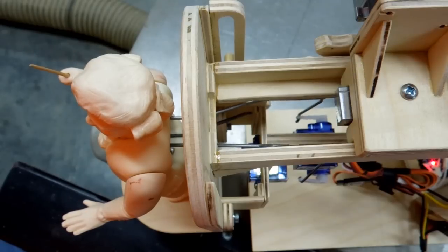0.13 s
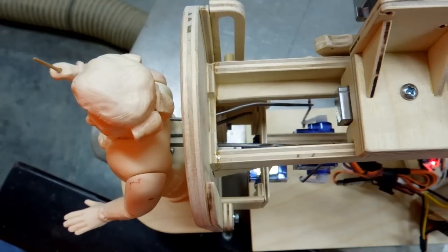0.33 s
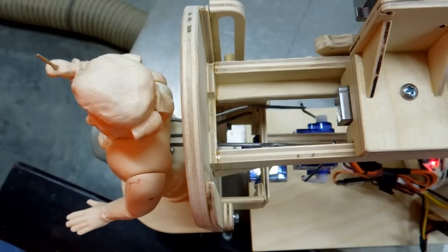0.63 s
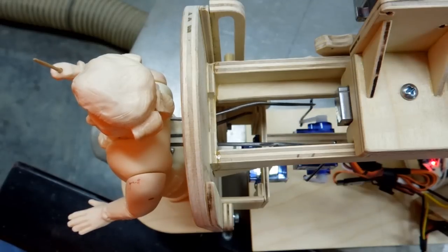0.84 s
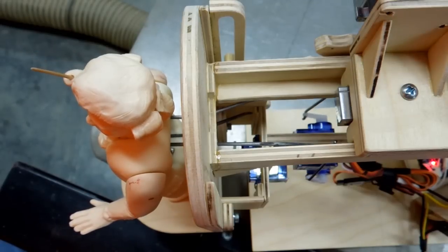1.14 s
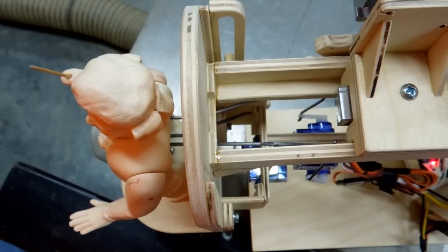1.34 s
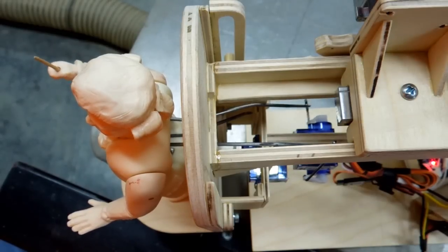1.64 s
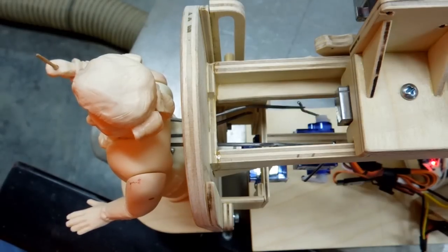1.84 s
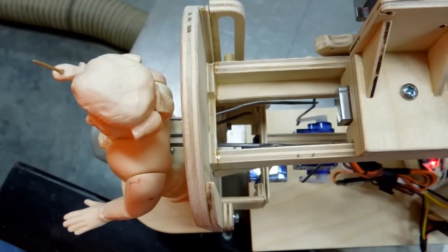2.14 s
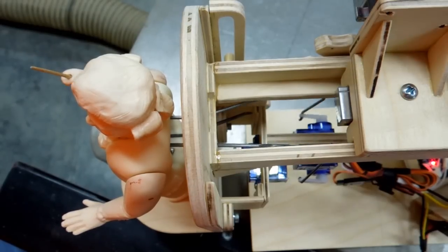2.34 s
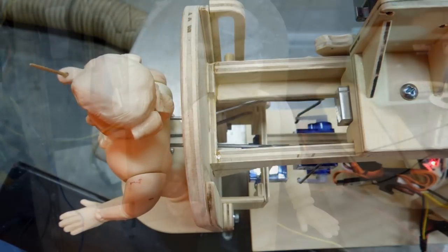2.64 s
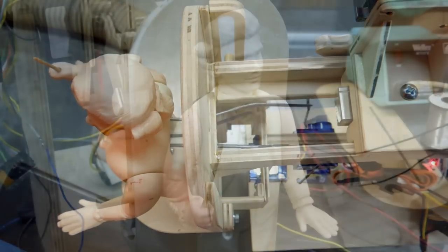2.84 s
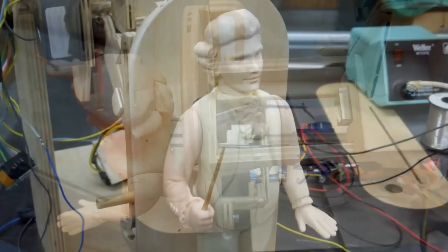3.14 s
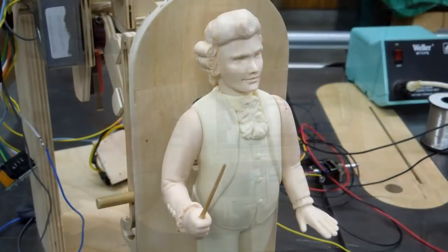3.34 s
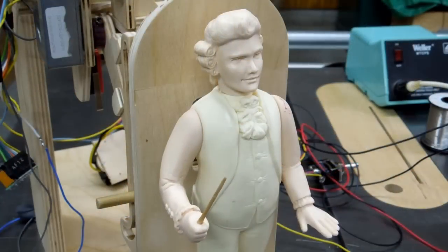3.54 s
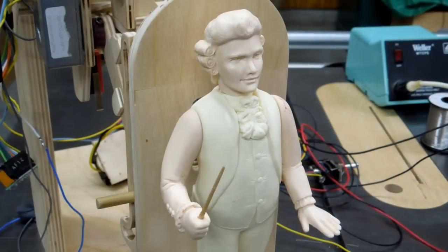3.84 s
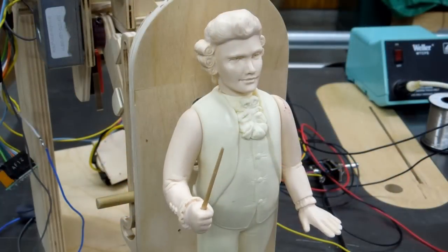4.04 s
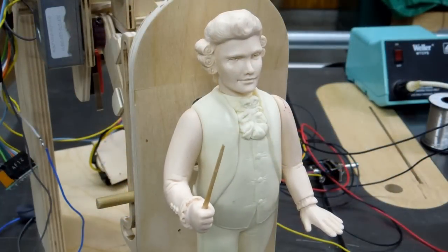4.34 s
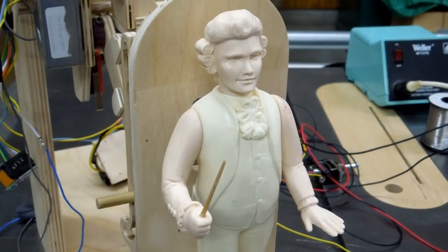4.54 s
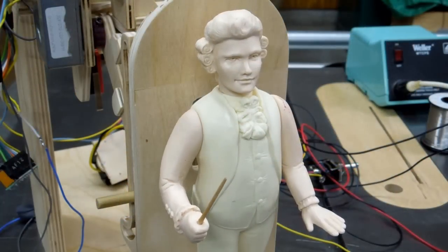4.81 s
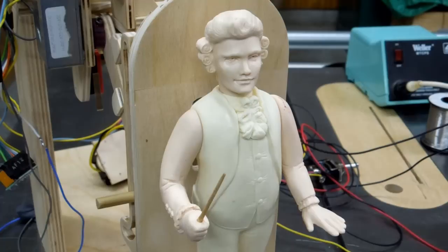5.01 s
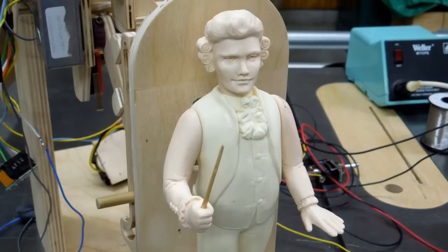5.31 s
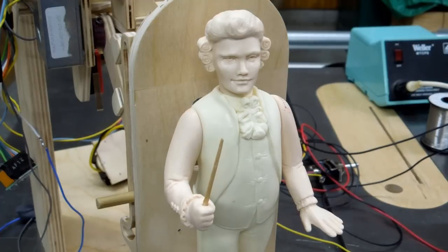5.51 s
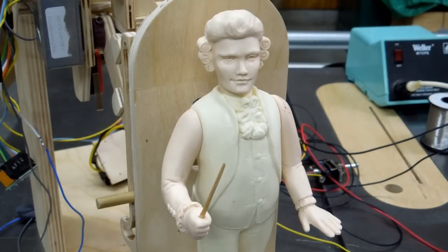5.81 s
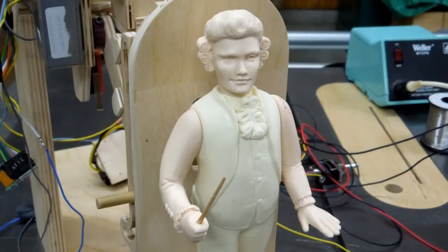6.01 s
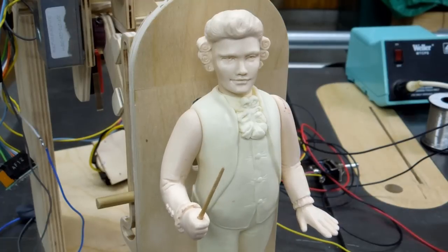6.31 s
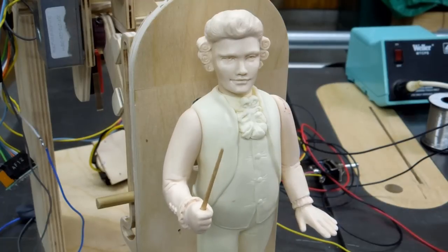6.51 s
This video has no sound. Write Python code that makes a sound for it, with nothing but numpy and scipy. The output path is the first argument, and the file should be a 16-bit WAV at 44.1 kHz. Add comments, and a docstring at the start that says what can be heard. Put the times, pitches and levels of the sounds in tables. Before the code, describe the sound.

From the start, a small servo motor is heard close up, swinging a puppet's arm through a rod in a plywood frame. Its plastic gears make a fine, high, clicking buzz with a fast flutter and little catches. Each lift and each fall lasts about 0.6 seconds, with a very brief rest at every turn, so the pattern repeats evenly about every 1.2 seconds. At first the sound is bright and raspy, heard from above the open mechanism, with the frame and rod ringing lightly. Between about 2.6 and 3.6 seconds it blends smoothly into the same motor heard from in front, softer and less bright, with a slight judder on the downstrokes. The strokes continue until the end, at around 6.5 seconds. A soft, low rush of workshop air lies underneath throughout, joined from about 3 seconds by a faint electrical hum and fan drone.

```python
"""A hobby servo swings a puppet's baton arm up and down through a rod in a plywood frame.
Its controller kicks the motor 50 times a second; the plastic gear teeth mesh and rattle, making the
gear case, frame and rod ring. Every beat has the same lift and fall, the same tight spots in the
gears and a brief rest at each turn. It is heard first from above the open mechanism, then, after a
cross-fade, from the front of the figure, where mains hum and a fan join the workshop's soft air noise."""
import sys
import numpy as np
from scipy import signal
from scipy.fft import rfft, irfft
from scipy.io import wavfile
from scipy.ndimage import uniform_filter1d

SR = 44100
rng = np.random.default_rng(int(sys.argv[2]) if len(sys.argv) > 2 else 0)


def transcribe(u):
    """Save the signal u as a 16-bit wav file named by the first command-line argument.

    u: samples, shape (n,) or (channels, n), limited to [-1, 1]; the rate is SR.
    q: integer samples, one column per channel.
    """
    v = np.clip(np.atleast_2d(u).T, -1, 1)
    q = np.round(v * 32767).astype(np.int16)
    wavfile.write(sys.argv[1], SR, q)


N = 293706
TIME, HZ = np.arange(N) / SR, np.fft.rfftfreq(N, 1 / SR)
CONTROL_HZ = 50
# one beat of the baton: the arm is lifted, rests, is lowered and rests again
BEAT_S, LIFT_S, LOWER_AT_S, LOWER_S = 1.24, 0.577, 0.607, 0.592


def servo(lift_at_s, lift, lower, case_modes, frame_modes, rod_modes, loaded_tone,
          start_load, case_rest_db, case_drop_db, frame_rest_db, judder_db):
    """Tooth strikes ring the gear case, the plywood frame and the push rod, beat after beat."""
    beat = (TIME - lift_at_s) % BEAT_S  # seconds into the current beat
    kick = control_kick()
    steps_db = judder_db * judder(beat)
    teeth = gear_teeth(arm_load(beat, start_load), loaded_tone) * jolts(beat) * amp(0.13 * steps_db)
    teeth = colour(teeth, 1 + amp(-11) * board_echoes(die_away_s=0.053))
    case = ring(teeth * amp(2.6 * kick), case_modes, steepness=3.47)
    frame = ring(teeth * amp(1.5 * kick), frame_modes, steepness=3.57)
    blows = teeth * (1 + 1.4 * np.tanh(2 * wander(690)))  # the loose rod takes the blows unevenly
    rod = ring(blows * amp(4.5 * kick + steps_db), rod_modes, steepness=4.7)
    case *= stroke_gain(beat, lift, lower, column=1, binding=0.99,
                        rest_db=case_rest_db, drop_db=case_drop_db, coast_s=0.024)
    frame *= stroke_gain(beat, lift, lower, column=2, binding=0.53,
                         rest_db=frame_rest_db, drop_db=0.5, coast_s=0.03)
    rod *= stroke_gain(beat, lift, lower, column=3, binding=0, rest_db=-54, drop_db=-1.5, coast_s=0.03)
    return amp(1.27) * case + amp(0.82) * frame + amp(0.85) * rod


def servo_from_above():
    """Above the open mechanism, the bright gear case is the loudest part."""
    # where gear case, frame and rod ring: (pitch [Hz], width [Hz], level [dB])
    case_modes = [(5770, 1030, -8), (7140, 210, -3), (7580, 410, 0.5), (8300, 360, -6.5), (8840, 610, 2),
                  (9910, 310, 0), (11000, 460, -4.5), (11560, 400, -2.5), (12500, 700, -7.5),
                  (13500, 800, -10.5), (14070, 400, -7.5)]
    frame_modes = [(1900, 200, -9), (2380, 560, -12.5), (2940, 320, -4), (3550, 120, 1), (4060, 310, 1.5),
                   (4760, 650, -5)]
    rod_modes = [(1200, 150, -4), (1443, 45, 3.5), (1686, 110, -5.5)]
    # loudness along each stroke: (time [s], gear case [dB], frame [dB], rod [dB])
    lift = [(0, -25, -36.5, -51), (0.07, -24, -35, -54), (0.12, -23, -33.5, -54.5),
            (0.2, -22.5, -33.0, -57), (0.29, -22, -34.5, -57), (0.4, -24, -36.0, -51.5),
            (0.49, -20.5, -33, -56), (0.578, -19, -33, -55)]
    lower = [(0, -18, -32, -45), (0.03, -22, -32.5, -46), (0.1, -22.5, -37, -53), (0.2, -22, -35.5, -49.5),
             (0.3, -23.5, -35.5, -50.5), (0.39, -22.5, -35, -50.0), (0.47, -21.5, -34, -45.5),
             (0.54, -18, -33.5, -47.5), (0.592, -19.5, -34.0, -47)]
    # how the arm's weight changes the tone of the teeth: (frequency [Hz], boost [dB])
    loaded_tone = [(1800, 0), (2300, 2.5), (3000, -4.5), (3500, 4), (3850, 0), (4500, 4), (5000, -1.5),
                   (5900, 1.5), (7500, -0.5), (8300, -2), (8800, -7.5), (9800, -0.5), (11400, 3.5),
                   (12800, -3), (14000, 0)]
    lift_at_s = 0.222
    return servo(lift_at_s, lift, lower, case_modes, frame_modes, rod_modes, loaded_tone,
                 start_load=0.39, case_rest_db=-37.5, case_drop_db=7, frame_rest_db=-41, judder_db=-0.3)


def servo_from_front():
    """In front of the figure, the gear case is softer and the rod judders on the way down."""
    # where gear case, frame and rod ring: (pitch [Hz], width [Hz], level [dB])
    case_modes = [(5340, 280, -3.5), (6600, 330, -4), (7110, 590, -2.5), (7850, 390, -3.5),
                  (8450, 500, -1.5), (9300, 330, -3.5), (10360, 410, -0.5), (10900, 400, -4.5),
                  (11700, 480, 0.5), (12500, 600, -6), (13500, 700, -10), (14100, 400, -10)]
    frame_modes = [(1890, 120, -10.5), (2620, 390, -15.5), (3120, 370, -11.5), (3690, 410, -2),
                   (4157, 340, -1), (4730, 180, -6)]
    rod_modes = [(1375, 37, 2.5), (1520, 130, -8.5), (1670, 95, -10.5)]
    # loudness along each stroke: (time [s], gear case [dB], frame [dB], rod [dB])
    lift = [(0, -32.0, -35.5, -49), (0.07, -32, -33.5, -53), (0.12, -31.5, -31.5, -50.5),
            (0.2, -32.5, -35.5, -52.0), (0.29, -31, -33, -52), (0.4, -31.5, -33.5, -51.5),
            (0.49, -29, -31.5, -51.5), (0.578, -29, -32.5, -48.5)]
    lower = [(0, -25.0, -27.5, -48), (0.03, -27.0, -32.5, -43), (0.1, -27, -32, -45.5),
             (0.2, -28.5, -33, -47.5), (0.3, -32, -36.5, -49), (0.39, -33.5, -36.5, -47),
             (0.47, -31.0, -35, -47), (0.54, -26, -30, -44), (0.592, -29.5, -33.0, -47.5)]
    # how the arm's weight changes the tone of the teeth: (frequency [Hz], boost [dB])
    loaded_tone = [(1800, 1), (2400, 8), (3100, -4), (3600, 3), (4700, 0), (5800, -0.5), (7500, -1),
                   (8900, -2), (9800, -0.5), (11400, 1.5), (12700, -4.5), (14000, 1.5)]
    lift_at_s = 3.882
    return servo(lift_at_s, lift, lower, case_modes, frame_modes, rod_modes, loaded_tone,
                 start_load=0.028, case_rest_db=-38.5, case_drop_db=-0.5, frame_rest_db=-38.5,
                 judder_db=3.0)


def gear_teeth(load, loaded_tone, mesh_hz=1440, rattles_per_s=8500, flutter_db=1.03):
    """The motor gear's teeth strike at an unsteady rate; the slack wheels behind it rattle at random."""
    sag = 0.5 - (TIME * CONTROL_HZ - 0.2) % 1  # the motor leaps at each control pulse, then slows
    tooth_hz = mesh_hz * (1 + 0.15 * sag + 0.05 * wander(45) + 0.012 * wander(500))
    strikes = np.diff(np.floor(np.cumsum(tooth_hz) / SR), prepend=0)
    mesh = strikes * amp(2.0 * rng.standard_normal(N))
    whine = amp(-4 + 5 * load ** 2) * unit(mesh - mesh.mean())  # load makes the mesh more regular
    rattle_size = amp(3.5 * np.minimum(rng.standard_normal(N), 2.2)) * rng.choice([-1., 1.], N)
    rattle = rattle_size * (rng.random(N) < rattles_per_s / SR)
    teeth = steady(whine + unit(rattle)) * amp(flutter_db * wander(102))
    return (1 - load) * teeth + load * colour(teeth, amp(curve(loaded_tone)))


def control_kick(first_s=0.0034, half_width_s=0.0026):
    """Each control pulse gives the motor a short push."""
    cycles_away = ((TIME - first_s) * CONTROL_HZ + 0.5) % 1 - 0.5
    return bump(cycles_away / CONTROL_HZ, half_width_s)


def arm_load(beat, at_start):
    """The weight on the gears grows through each lift and is gone on the way down."""
    return (beat < LIFT_S) * np.interp(beat, [0, LIFT_S], [at_start, 1])


def jolts(beat, half_width_s=0.0011):
    """The gears knock through their slack and catch, so the teeth briefly strike harder."""
    # catches of the gears: (time into the beat [s], boost [dB])
    catches = [(.021, 4), (0.231, 0), (.367, 0), (.421, 0.5), (.567, -1), (.737, 4.5), (.841, 4), (.9, 5),
               (1.109, 2), (1.14, 0.5), (1.188, 7.5)]
    return amp(sum(db * bump(beat - at_s, half_width_s) for at_s, db in catches))


def judder(beat):
    """The sinking arm overruns and is caught at every second control pulse: a swing from +1 to -1."""
    # juddering stretches of the beat: (start [s], end [s])
    runs = [(.64, .89), (.94, 1.15)]
    return sum((beat > start - 0.5 / CONTROL_HZ) * (beat < end)
               * np.cos(np.pi * CONTROL_HZ * (beat - start)) for start, end in runs)


def stroke_gain(beat, lift, lower, column, binding, rest_db, drop_db, coast_s):
    """One part's loudness as the motor starts, drives, then lets the gears coast to a faint chatter."""
    # the gears bind at the same angles in every lift: (time [s], half-width [s], boost [dB])
    tight_spots = [(0.071, 0.02, 5.5), (0.233, 0.0035, 2.5), (0.319, 0.005, 4.5), (0.361, 0.02, 4.5),
                   (0.433, 0.032, 5.5), (0.52, 0.0068, 3.6), (0.555, 0.019, 5)]
    lowering = beat >= LOWER_AT_S
    stroke_s = beat - lowering * LOWER_AT_S
    lifted_s = np.minimum(stroke_s, LIFT_S)
    tight_db = sum(db * bump(lifted_s - at_s, width) for at_s, width, db in tight_spots)
    lift_db = np.interp(stroke_s, *np.transpose(lift)[[0, column]])
    lower_db = np.interp(stroke_s, *np.transpose(lower)[[0, column]])
    driven_db = np.where(lowering, lower_db, lift_db + binding * tight_db)
    soft_start_db = 3.5 * np.exp(-stroke_s / 0.0072)
    stopped_s = np.maximum(stroke_s - np.where(lowering, LOWER_S, LIFT_S), 0)
    coast_db = rest_db + (driven_db - drop_db - rest_db) * np.exp(-stopped_s / coast_s)
    level_db = np.where(stopped_s > 0, coast_db, driven_db - soft_start_db)
    return amp(uniform_filter1d(level_db, size=130))


def ring(strikes, modes, steepness):
    """A struck part rings at its own pitches (its modes), held at an even loudness."""
    return steady(unit(colour(strikes, resonances(modes, steepness))))


def resonances(modes, steepness):
    """A filter that favours a body's own pitches and falls away steeply below and above them."""
    power = sum(amp(db) ** 2 / (1 + (2 * (HZ - hz) / width) ** 2) for hz, width, db in modes)
    outside = np.maximum(modes[0][0] / (HZ + 1), 1) * np.maximum(HZ / modes[-1][0], 1)
    log_gain = np.log(np.sqrt(power) / outside ** steepness + 1e-5)
    mirrored = np.r_[log_gain, log_gain[-2:0:-1]]
    return np.exp(np.conj(signal.hilbert(mirrored))[:len(HZ)])  # ringing comes only after the strike


def board_echoes(die_away_s):
    """A filter of quick, fading echoes from nearby boards."""
    t = TIME[:SR // 4]
    echoes = rng.standard_normal(len(t)) * amp(-60 * t / die_away_s) * (t > 0.001)
    return rfft(echoes / np.linalg.norm(echoes), N)


def widen_treble(x, front, lean_above=0.39, lean_front=-0.52):
    """The treble flickers between the ears; everything lower stays in the centre."""
    # stereo width: (frequency [Hz], level of what differs between the ears [dB])
    width_above = [(2000, -40), (4200, -31), (6200, -23), (7400, -13), (8300, -10), (9000, -10), (9900, -7),
                   (11400, -7), (12600, -4), (13800, -5)]
    width_front = [(2000, -40), (4200, -45), (5400, -30), (6200, -12), (7400, -9), (9000, -7), (9900, -6),
                   (11400, -9), (12600, -7), (13800, -6)]
    flicker = np.tanh(3 * wander(320)) + (1 - front) * lean_above + front * lean_front
    shifted = -np.imag(signal.hilbert(x)) * unit(flicker)  # shifted by a quarter of a wave
    side = (1 - front) * colour(shifted, amp(curve(width_above)))
    side += front * colour(shifted, amp(curve(width_front)))
    return np.array([amp(-2.11) * (x + side), amp(-2.34) * (x - side)])


def room_air():
    """The workshop's air is a soft, low rush, partly different in each ear."""
    # tone of the air: (frequency [Hz], relative level [dB])
    air_tone = [(20, -5), (35, 3.5), (70, -1), (150, -1), (300, -4.5), (550, -7.5), (900, -8), (1200, -6),
                (3000, -15), (14000, -21)]
    # how alike it is in both ears: (frequency [Hz], likeness [0 to 1])
    air_likeness = [(30, 0.81), (120, 0.8), (250, 0.66), (600, 0.48), (900, 0.56), (1300, 1), (14000, 1)]
    alike = curve(air_likeness)
    mid, side = (unit(colour(noise, amp(curve(air_tone)))) for noise in rng.standard_normal((2, N)))
    side = colour(side, np.sqrt((1 - alike) / (1 + alike)))
    return amp(-49.5) * np.array([mid + side, mid - side])


def mains_hum(waver=0.2):
    """The mains supply hums in two gently wavering tones."""
    # hum tones: (pitch [Hz], level [dB])
    tones = [(119.9, -56.5), (360, -73.5)]
    return sum(amp(db) * unit(np.cos(2 * np.pi * hz * TIME) * (1 + waver * wander(5.2)))
               for hz, db in tones)


def fan_drone():
    """A fan drones: noise gathered around a few low pitches."""
    # peaks of the drone: (pitch [Hz], width [Hz], relative level [dB])
    peaks = [(26.9, 6.7, 0.5), (63, 25, -19.5), (95.2, 13.5, -12.5), (193, 40, -18), (353, 24, -16.5),
             (686, 27, -12.5)]
    return amp(-52) * unit(colour(rng.standard_normal(N), resonances(peaks, steepness=2.7)))


def amp(db):
    """Turns decibels into a gain."""
    return 10 ** (np.asarray(db) / 20)


def unit(x):
    """Scales a signal to an average strength (rms) of 1."""
    return x / np.sqrt(np.mean(x ** 2) + 1e-20)


def steady(x, size=3000):
    """Evens out slow changes in loudness, leaving the fast grain."""
    return x / np.sqrt(np.abs(uniform_filter1d(x ** 2, size)) + 1e-12)


def bump(offset, half_width):
    """A bell shape, 1 high where the offset is zero."""
    return np.exp(-0.5 * (offset / half_width) ** 2)


def curve(points):
    """Joins (frequency [Hz], value) points into a value for every frequency."""
    hz, value = np.transpose(points)
    return np.interp(np.log(HZ + 1), np.log(hz + 1), value)


def colour(x, gain):
    """Filters a signal with a gain for each frequency."""
    return irfft(rfft(x) * gain, N)


def wander(rate_hz):
    """A smooth random wobble, up to about the given rate."""
    return unit(colour(rng.standard_normal(N), 1 / (1 + (HZ / rate_hz) ** 4)))


def scene(fade_from_s=2.6, fade_to_s=3.56):
    """The servo in the workshop; front goes from 0 above the mechanism to 1 in front of the figure."""
    front = np.clip((TIME - fade_from_s) / (fade_to_s - fade_from_s), 0, 1)
    mechanism = (1 - front) * servo_from_above() + front * servo_from_front()
    hum_fade = np.minimum(front / 0.7, 1) ** 2
    return widen_treble(mechanism, front) + room_air() + hum_fade * (mains_hum() + fan_drone())


def record(dry, ceiling=0.72, top_hz=14230):
    """Rounds off the highest peaks and cuts the very top of the treble."""
    rounded = dry / (1 + (dry / ceiling) ** 6) ** (1 / 6)
    low_pass = signal.firwin(801, top_hz, window=("kaiser", 9), fs=SR)
    return signal.oaconvolve(rounded, low_pass[None], "same")


dry = scene()
out = record(dry)
transcribe(out)
```